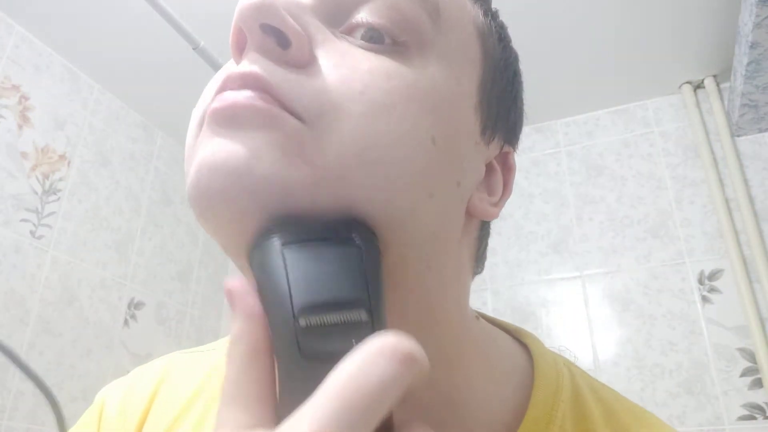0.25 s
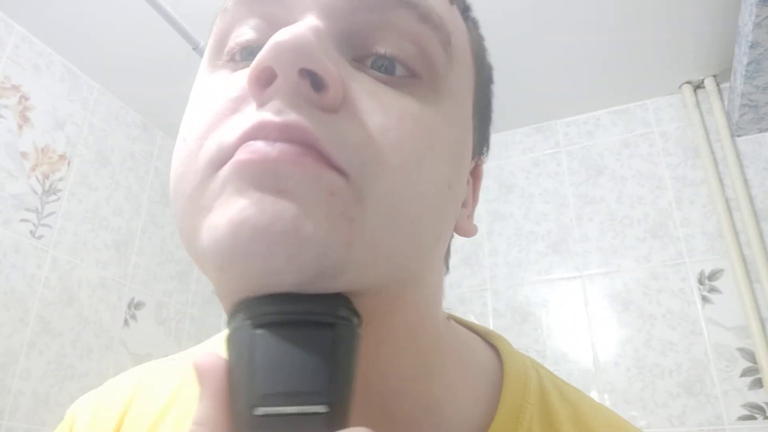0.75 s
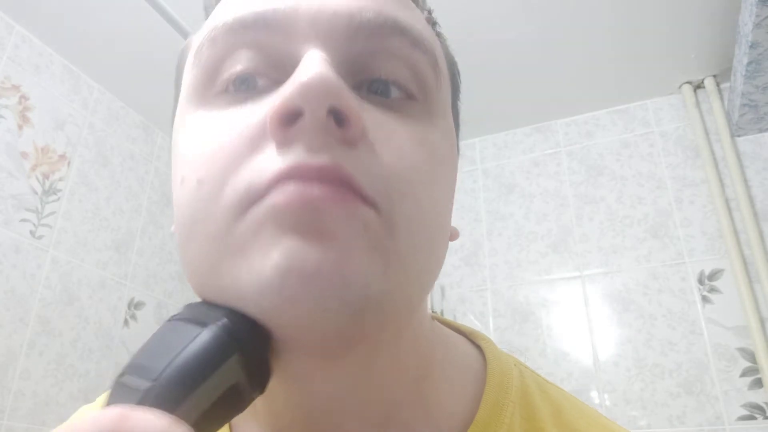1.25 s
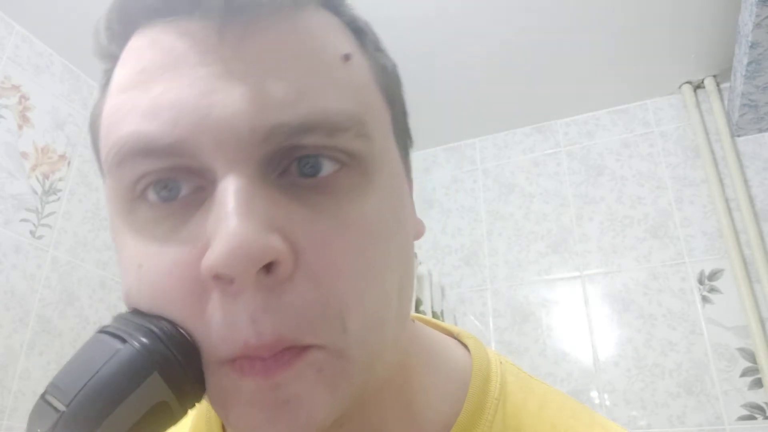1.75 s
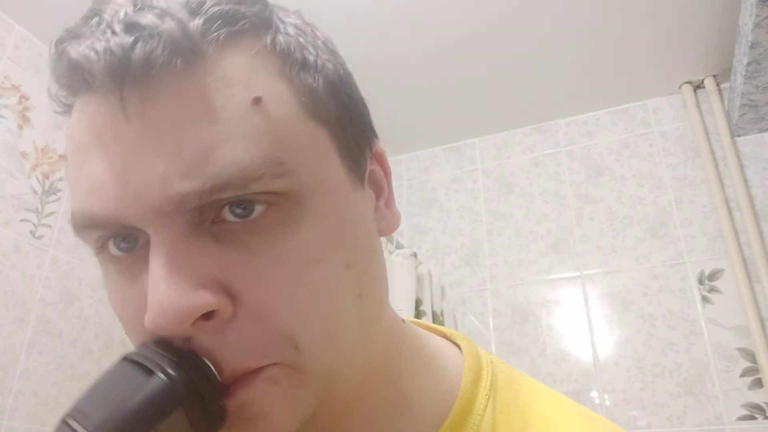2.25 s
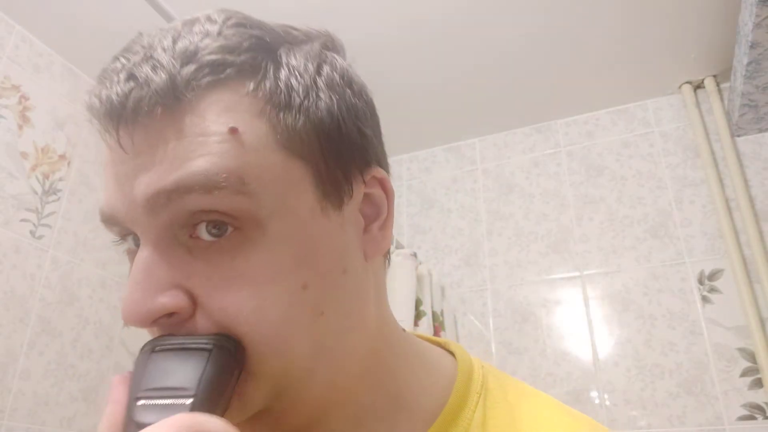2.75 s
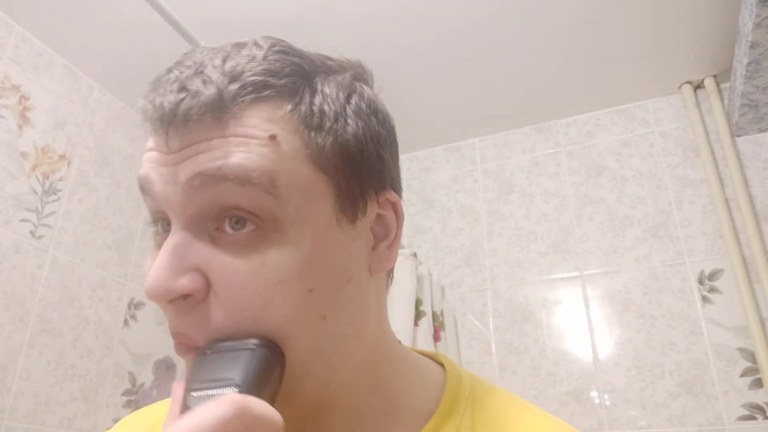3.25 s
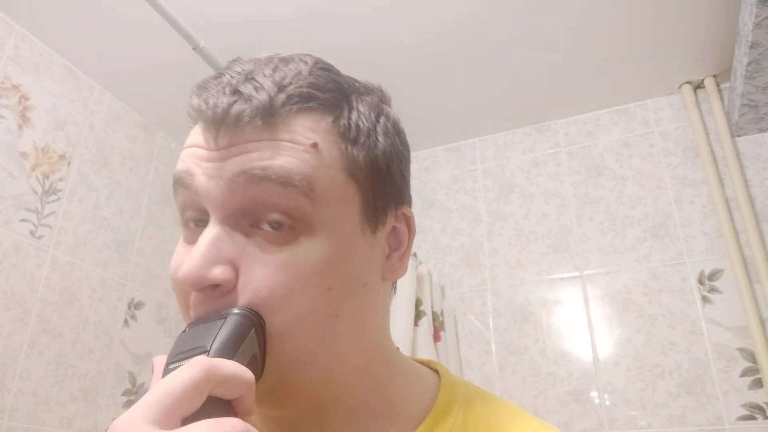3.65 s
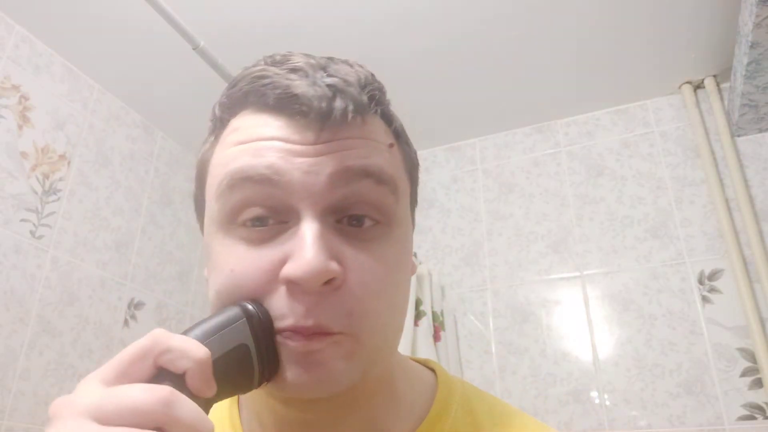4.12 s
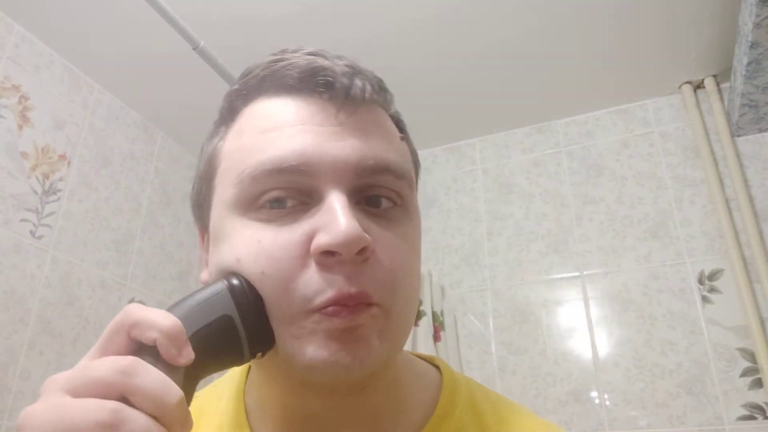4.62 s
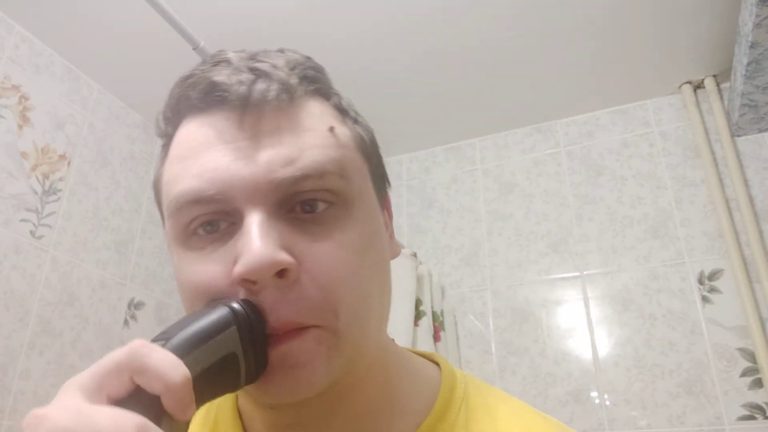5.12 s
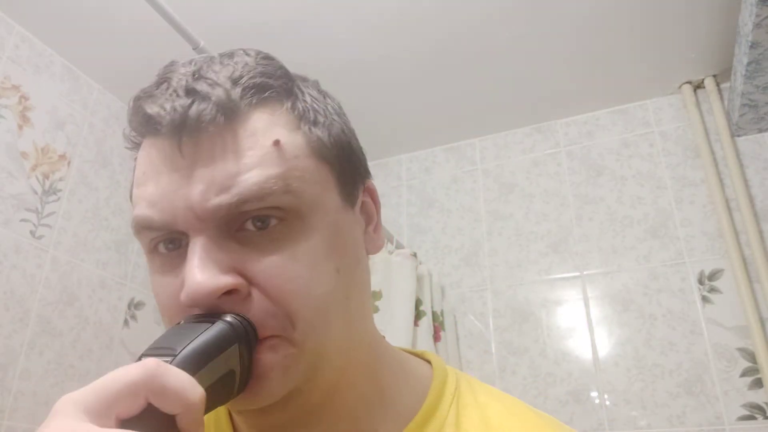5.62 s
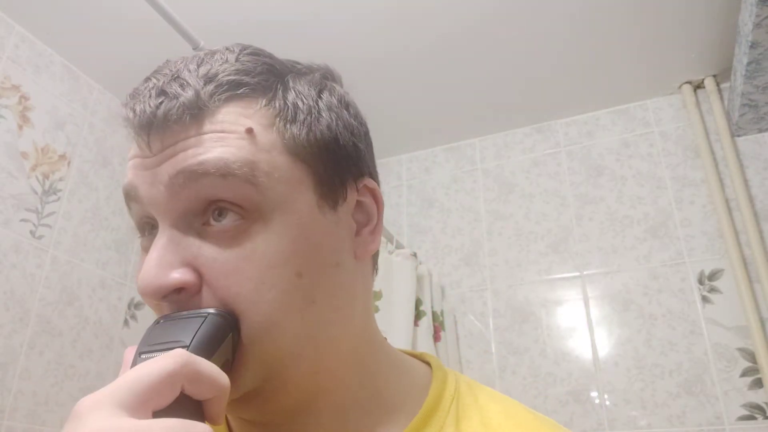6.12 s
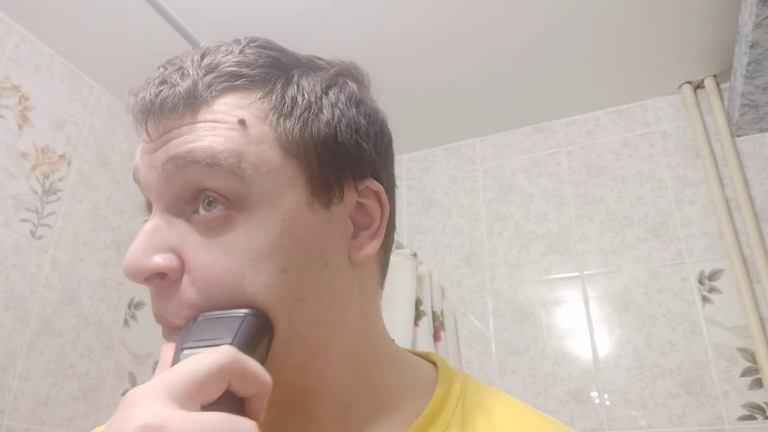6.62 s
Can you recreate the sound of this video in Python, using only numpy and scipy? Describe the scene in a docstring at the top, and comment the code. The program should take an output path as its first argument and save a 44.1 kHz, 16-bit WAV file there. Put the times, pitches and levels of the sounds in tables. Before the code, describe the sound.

The shaver is already running at 0 s and continues to the end, around 6.9 s, with no start or stop. Its gear whine, with a base near 550 Hz and stronger tones around 1.6 to 3.3 kHz, trembles and shifts slightly under load. Around it are a dry plastic rattle, fine stubble crackle and bright steel hiss, with the topmost sizzle stronger on the left. Small ticks and knocks come at 0.3 to 0.5, 1.3 and 1.8 s. Skin rustle is softly fuller from 1.5 to 2.5 s. From 2 to 3.2 s pressing makes the scrape rougher, with knocks near 2.3 and 2.8 s. A short hard rasp comes at 4 s, then lighter strokes; firmer scraping returns from 5 to 6 s, with ticks near 5.1 and 6 s, then eases. Short tiled reflections surround it over faint low air, drone and passing hums.

```python
"""A rotary electric shaver works over chin and lip at arm's length from a phone in a small tiled bathroom.
Motor and gear teeth whine as sums of wavering tones. The cutters are filtered noise: they hiss in their
steel caps, rattle the housing, snip stubble and scrape once a turn, harder when pressed.
Noise also makes the skin rustle and the knocks. Under it lie low air, a drone and faint low hums that
come and go. The left microphone gets more of the highest treble, the right one less."""
import sys
import numpy as np
from scipy import signal
from scipy.fft import rfft, irfft, next_fast_len
from scipy.io import wavfile
from scipy.ndimage import uniform_filter1d, map_coordinates

SR = 44100
rng = np.random.default_rng(int(sys.argv[2]) if len(sys.argv) > 2 else 0)


def waveform_to_disk(signal):
    """Save audio, clipped to [-1, 1], as 16-bit WAV at the path in sys.argv[1]."""
    frames = np.transpose(np.atleast_2d(signal))
    scaled = np.clip(frames, -1, 1) * 32767
    samples = np.round(scaled).astype(np.int16)
    wavfile.write(sys.argv[1], SR, samples)


N = 302922
TIME = np.arange(N) / SR
FFT_SIZE = next_fast_len(N)
FREQ = np.maximum(np.arange(FFT_SIZE // 2 + 1) * SR / FFT_SIZE, 1)

CUTTER_TEETH = 17  # teeth that pass in one turn of the cutters
# base colour of the steel hiss: (f/Hz, left level/dB per Hz, right level/dB per Hz)
HISS_COLOUR = [(2420, -112, -110), (4080, -91.5, -86.5), (4960, -89, -81.5), (5470, -86, -79.5),
               (6700, -87, -79.5), (7660, -83, -84.5), (9500, -82.5, -93.5), (11200, -81.5, -95.5),
               (13200, -83.5, -101), (15000, -88, -105), (15500, -87, -117)]
# how the cutters' level changes from one patch of stubble to the next; only the changes count:
# (t/s, housing rattle level/dB, steel hiss level/dB)
STUBBLE_PATCHES = [(0, -47, -39.5), (.5, -46.5, -39.5), (.72, -48.5, -41.5), (.95, -47, -39),
                   (1.2, -46.5, -44), (1.36, -45, -39), (1.7, -46.5, -43), (2.1, -47, -43.5),
                   (2.35, -47, -39.5), (2.8, -43.5, -40.5), (3.4, -48.5, -42), (3.8, -46, -43.5),
                   (4.06, -46.5, -40.5), (4.2, -47, -43), (4.65, -45, -43), (5.2, -47, -42),
                   (5.6, -46, -42), (5.98, -45.5, -39.5), (6.25, -46, -42), (6.87, -48, -44.5)]


def undb(db):
    """Turn decibels into gain."""
    return 10 ** (np.asarray(db) / 20)


def curves(table):
    """Draw straight lines between the rows of a table: one curve over time for each column."""
    s, *columns = np.transpose(table)
    return np.array([np.interp(TIME, s, c) for c in columns])


def colour(table):
    """Gain at every frequency for each dB column of a spectrum."""
    hz, *columns = np.transpose(table)
    return undb([np.interp(np.log(FREQ), np.log(hz), c) for c in columns])


def shape(x, gain):
    """Filter so that white noise of rms 1 gets the given density per Hz."""
    filtered = irfft(rfft(x, FFT_SIZE) * gain, FFT_SIZE)
    return filtered[..., :N] * np.sqrt(SR / 2)


def lift(x, hz, kind, db):
    """Raise or lower one band by a level curve."""
    sos = signal.butter(3, hz, kind, fs=SR, output="sos")
    return x + (undb(db) - 1) * signal.sosfiltfilt(sos, x)


def unit(x):
    """Scale to rms 1."""
    return x / np.sqrt(np.mean(x ** 2))


def walk(rate):
    """Smooth random curve that takes a new value, of spread 1, rate times a second."""
    knots = rng.standard_normal(int(N / SR * rate) + 4)
    steps = np.arange(0, len(knots) - 1, 1 / 8)
    fine = map_coordinates(knots, [steps], order=3, mode="nearest")
    return np.interp(TIME * rate * 8, np.arange(len(fine)), fine)


def blend_weights(count, rate):
    """Random weights that wander over time while their summed power stays 1."""
    weights = np.array([walk(rate) for _ in range(count)])
    return weights / np.sqrt(np.sum(weights ** 2, axis=0))


def held(start, end, attack_s, release_s):
    """Rise around start, hold at no more than 1, fall around end."""
    rise = .5 + (TIME - start) / attack_s
    fall = .5 + (end - TIME) / release_s
    return np.clip(np.minimum(rise, fall), 0, 1)


def resonate(x, hz, width):
    """Pass sound through one narrow resonance twice, then scale to rms 1."""
    b, a = signal.iirpeak(hz, hz / width, fs=SR)
    return unit(signal.lfilter(b, a, signal.lfilter(b, a, x)))


def tiles(x, t60, wet_db):
    """Direct sound plus a dense short ring of the tiled walls, different at each microphone."""
    t = TIME[:SR // 2]
    tail = rng.standard_normal((2, len(t))) * np.exp(-np.log(1000) * t / t60) * (t > .003)
    tail *= undb(wet_db) / np.sqrt(np.sum(tail ** 2, axis=1, keepdims=True))
    both = x * np.ones((2, 1))
    echoes = signal.fftconvolve(both, tail, axes=1)[:, :N]
    return (both + echoes) / np.sqrt(1 + undb(2 * wet_db))


def moving_tiles(x, t60, wet_db, count=4):
    """The wall echoes change as the shaver is moved: several rings blend into one another."""
    direct = x / np.sqrt(1 + undb(2 * wet_db))
    out = direct
    for weight in blend_weights(count, .98):
        out = out + weight * (tiles(x, t60, wet_db) - direct)
    return out


def low_background(drone_hz=29.6, apart=0.8, octave_db=-17):
    """Low air noise, a swelling deep drone and faint low hums with octaves, nearly alike on both sides."""
    # colour of each layer of air noise: (f/Hz, level/dB per Hz)
    air_colour = [(8, -88.5), (20, -84.5), (40, -94), (60, -95), (125, -103), (158, -97.5), (200, -106),
                  (500, -109), (2000, -118)]
    # swells of the drone, added to its resting level: (time of the peak t/s, added level/dB)
    swells = [(.25, -64), (1.7, -62), (2.15, -68), (3.75, -68), (4.65, -69), (5.05, -72), (5.85, -67),
              (6.6, -70)]
    # faint low hums come and go, one of them a harmonic of the motor shaft:
    # (start t/s, end t/s, f/Hz, level of the main tone/dB)
    hums = [(0, 0.18, 87.7, -71), (.05, .95, 295.3, -77.5), (0.698, 1.653, 108.3, -76.5),
            (0.897, 1.9, 89.7, -72.5), (3.39, 4.253, 79.6, -69.5), (4.297, 5.05, 107.6, -71.5),
            (4.349, 6.298, 77.05, -75), (5.243, 5.807, 106.5, -67)]
    rest_db, swell_s, hum_fade_s = -75.5, .17, .2

    air = rng.standard_normal(N) + apart * rng.standard_normal((2, N))
    out = shape(air, colour(air_colour))
    drone_gain = undb(rest_db)
    for s, db in swells:
        drone_gain = drone_gain + undb(db) * np.exp(-((TIME - s) / swell_s) ** 2)
    out = out + np.sqrt(2) * drone_gain * np.sin(2 * np.pi * drone_hz * TIME + .5 * walk(3.44))
    for start, end, hz, db in hums:
        angle = 2 * np.pi * hz * TIME + .11 * walk(5.2)
        tone = np.sin(angle) + undb(octave_db) * np.sin(2 * angle)
        out = out + np.sqrt(2) * undb(db) * held(start, end, hum_fade_s, hum_fade_s) * tone
    return out


def skin(apart=0.15):
    """The head slides over skin: low noise rustles softly."""
    # base colour of the rustle: (f/Hz, level/dB per Hz)
    skin_colour = [(60, -115), (160, -100.5), (240, -101), (320, -99), (500, -103), (1200, -114)]
    # how the rustle's level changes; only the changes count: (t/s, level/dB)
    rustle_level = [(0, -71.5), (.8, -72.5), (1.5, -65.5), (2.15, -65.5), (2.55, -67.5), (3, -70),
                    (3.5, -71), (5.5, -76), (6.87, -83)]
    noise = rng.standard_normal(N) + apart * rng.standard_normal((2, N))
    return shape(noise, colour(skin_colour)) * unit(undb(curves(rustle_level)[0]))


def knocks(tick_db=38, body_db=47, tick_s=0.005, body_s=0.018, lead_s=0.003):
    """The floating head skids and clicks in its mount: a steel tick and a short chatter of the housing."""
    # stubble catches and the head knocks on its mount, before tick_db and body_db are added:
    # (t/s, tick level/dB, body level relative to it/dB)
    catches = [(.307, -41, -5), (0.4398, -33.5, -13), (.486, -31, -26), (1.2864, -31, -22),
               (1.8383, -34, -12), (2.296, -38, -2), (2.832, -32, -16), (5.145, -32, -22),
               (5.995, -30.5, -5)]
    # colour of the housing's thud: (f/Hz, level/dB per Hz)
    thud_colour = [(150, -112), (400, -101), (700, -93.5), (1200, -93), (2300, -82), (3000, -85),
                   (4500, -97), (8000, -122)]
    skid_db, skid_rate = 3, 450  # spread of the chatter in dB, new values per second

    tick, body = np.zeros((2, N))
    for s, db, low_db in catches:
        age = TIME - s
        tick += (age > 0) * undb(db + tick_db) * np.exp(-np.abs(age) / tick_s)
        # the body rises over lead_s and dies away over body_s
        body += undb(db + low_db + body_db) * np.exp(-np.maximum(age / body_s, -age / lead_s))
    noise = rng.standard_normal((2, N)) * unit(undb(skid_db * walk(skid_rate)))
    dry_knocks = shape(tick * noise, colour(HISS_COLOUR)) + shape(body * noise, colour(thud_colour))
    return tiles(dry_knocks, t60=0.13, wet_db=-25)


def random_sizes(spread_db=3):
    """Gains for small hits: many faint, a few loud."""
    return undb(spread_db * np.minimum(rng.exponential(size=N), 3))


def snips(rate=450, ring_s=0.00079):
    """Single hairs are cut with tiny cracks: random hits start short fading bursts of noise."""
    hits = (rng.random(N) < rate / SR) * random_sizes()
    fading = signal.lfilter([1], [1, -np.exp(-1 / (ring_s * SR))], hits)
    return unit(fading * rng.standard_normal((2, N)))


def housing_ring(teeth, rate=700):
    """Blade taps ring the plastic housing; as the grip shifts, one resonance after another comes forward."""
    # resonances of the housing: (f/Hz, width/Hz, left level/dB, right level/dB)
    housing_modes = [(1475, 130, -72, -70.5), (1803, 120, -61, -62), (2057, 170, -71, -68),
                     (2385, 180, -58, -64), (2560, 130, -64, -65.5), (2800, 140, -60, -66.5),
                     (3080, 230, -64, -64), (3764, 300, -65, -66)]
    grip_db, grip_rate = 3.5, 7  # spread of their strength in dB, new values per second

    # taps are likeliest once per passing tooth
    chance = rate / SR * (1 + np.cos(2 * np.pi * teeth))
    taps = (rng.random(N) < chance) * random_sizes() * rng.standard_normal((2, N))
    out = 0
    for hz, width, left_db, right_db in housing_modes:
        strength = unit(undb(grip_db * walk(grip_rate)))
        out = out + undb([[left_db], [right_db]]) * resonate(taps, hz, width) * strength
    return out * unit(undb(curves(STUBBLE_PATCHES)[0]))


def pressure():
    """How hard the head lies on the skin, about 0-1."""
    # the head is pushed against the skin: (start t/s, end t/s, pressure 0-1)
    pushes = [(0.092, 0.363, 0.18), (1.05, 1.347, 0.26), (1.493, 1.645, 0.27), (1.7, 2.047, 0.5),
              (2.072, 2.367, 0.83), (2.473, 2.7, 0.56), (2.69, 2.876, 0.78), (2.908, 3.246, 0.46),
              (3.424, 3.883, 0.31), (3.938, 4.03, 0.93), (4.33, 4.632, 0.32), (5.037, 5.276, 0.75),
              (5.3, 5.6, 0.57), (5.6, 5.803, 0.73), (5.83, 6.015, 0.58), (6.306, 6.53, 0.44),
              (6.616, 6.783, 0.33)]
    return sum(force * held(start, end, .097, .095) for start, end, force in pushes)


def clatter(teeth, size=1400):
    """The gear's small flaws come round again with every turn, and change slowly as the load shifts."""
    turns = teeth / (CUTTER_TEETH + 1)
    flaws = rng.standard_normal((6, size))
    places = np.arange(size) / size
    weights = blend_weights(len(flaws), 7)
    return unit(sum(w * np.interp(turns % 1, places, f) for w, f in zip(weights, flaws)))


def scrape(teeth, press, depth=2.6):
    """Once a turn a pressed cutter catches on its cap and slips free over about six milliseconds."""
    turns = teeth / CUTTER_TEETH - .85
    turn = np.round(turns)
    # every turn catches with its own random strength
    strength = undb(rng.standard_normal(int(turn[-1]) + 2))[turn.astype(int) + 1]
    offset = turns - turn
    contact = np.exp(-(offset / .11) ** 4) * (1 - 2.5 * offset)  # hardest early in the catch
    gate = 1 + depth * press * strength * contact
    return gate / np.sqrt(uniform_filter1d(gate ** 2, SR // 16))  # keep the average level even


def squeals(force, left_db=-11):
    """Each light glide excites one narrow resonance of a cap, at its own pitch."""
    # the caps squeal in light contact: (start t/s, end t/s, right level/dB, f/Hz, width/Hz)
    glides = [(0.045, .35, -48, 5500, 450), (0.067, 0.73, -48.5, 6030, 550), (0.393, .72, -50, 5430, 447),
              (0.735, 1.243, -48.5, 5820, 453), (1.22, 1.617, -51, 3010, 139.4),
              (1.418, 1.497, -39.5, 5820, 350), (2.433, 2.597, -42.5, 5710, 300),
              (2.611, 2.768, -46, 5790, 300.4), (2.814, 2.86, -44, 6600, 400), (3.61, 3.86, -50, 5690, 450),
              (3.874, 4.064, -47.5, 5850, 500), (4.953, 5.154, -46.5, 5680, 400),
              (5.62, 5.964, -48.5, 5760, 500)]
    out = np.zeros((2, N))
    for start, end, db, hz, width in glides:
        gate = held(start, end, .076, .092)
        on = gate > 0
        friction = (force * rng.standard_normal((2, N)))[:, on]
        out[:, on] += undb(db) * gate[on] * resonate(friction, hz, width)
    return out * undb([[left_db], [0]])  # left_db is relative to the right


def cap_mode(mode, force, bend):
    """Friction noise held in one steep-sided resonance whose pitch follows the load."""
    hz, width, left_db, right_db = mode[:4]
    band = undb([[left_db], [right_db]]) / (1 + 1j * FREQ / width) ** 2
    angle = 2 * np.pi * np.cumsum(hz * bend) / SR
    out = 0
    for wave in (np.cos, np.sin):  # two noises carried a quarter cycle apart
        out = out + shape(force * rng.standard_normal((2, N)), band) * wave(angle)
    return np.sqrt(2) * out


def cap_ring(mesh, ring_gain, drag, slip_db=1.03):
    """Friction rings the steel caps; each mode grips and slips a little on its own."""
    # resonances of the steel caps, the 11.6 kHz one strongest:
    # (f/Hz, width/Hz, left level/dB per Hz, right level/dB per Hz, share of the scrape 0-1)
    cap_modes = [(11595, 360, -71.5, -89, 0.95), (14450, 350, -75.5, -94, 0.47),
                 (8590, 110, -78, -87.5, 0.46), (5790, 420, -91, -83, 0), (2895, 145, -81, -85.5, 0)]
    # load bends the pitch of all modes alike: (t/s, strongest mode f/Hz)
    cap_pitch = [(0, 11470), (.1, 11870), (.28, 11870), (.45, 11670), (1.5, 11770), (1.8, 11580),
                 (3.2, 11640), (3.7, 11430), (4.05, 11690), (4.6, 11700), (5.2, 11570), (5.9, 11490),
                 (6.25, 11430), (6.87, 11680)]
    # extra level of the highest mode: (t/s, level/dB)
    upper_ring = [(0, -6), (1.4, 1), (1.6, 2), (2.3, 2), (2.5, 3), (3.22, 2), (3.35, -3), (4, 1),
                  (4.45, -1), (5.1, -2), (6.1, 2.5), (6.87, -6)]
    bend = curves(cap_pitch)[0] / cap_modes[0][0]
    out = 0
    for k, mode in enumerate(cap_modes):
        grip_db = slip_db * walk(28)
        if k == 1:  # the highest mode
            grip_db = grip_db + curves(upper_ring)[0]
        force = mesh * (ring_gain * drag) ** mode[4] * undb(grip_db)
        out = out + cap_mode(mode, force, bend)
    return out


def cutters(teeth, shared=0.54, snip_db=-12, hiss_share=0.25):
    """Housing rattle, steel hiss pulsing with the teeth, and the ring of the caps under the scraping."""
    # base colour of the housing rattle: (f/Hz, left level/dB per Hz, right level/dB per Hz)
    rattle_colour = [(133, -104, -104), (415, -100, -102), (740, -93, -103), (1070, -88.5, -93.5),
                     (1190, -91.5, -99.5), (1422, -90, -86), (1570, -84.5, -87), (2170, -85, -83.5),
                     (2680, -81, -84), (3300, -89, -88), (3970, -86, -86), (4700, -100.5, -97.5),
                     (8100, -125, -125)]
    # extra level of two bands: (t/s, rattle's low end level/dB, hiss's bright band level/dB)
    band_levels = [(0, -0.5, -1), (.9, 0, 2), (1.4, 1, 4.5), (2.2, 1.5, 3), (2.8, -4, -1.5), (3.5, 0, 0),
                   (4, -0.5, 1), (4.55, -5.5, 2.5), (5, -0.5, 0.5), (6, -2, 0), (6.87, 1, 3.5)]
    # growth with pressure, in dB per unit of pressure, before the average is evened out
    rattle_pressed_db, hiss_pressed_db, ring_pressed_db = 1.8, 2.5, 14
    resting_drag = .32  # least pressure that counts for the scrape
    tooth_depth, clatter_weight = .33, .68  # pulse by each tooth 0-1, gear clatter against noise

    press = pressure()
    rattle_db, hiss_db = curves(STUBBLE_PATCHES)
    rattle_gain = unit(undb(rattle_db + rattle_pressed_db * press))
    hiss_gain = unit(undb(hiss_db + hiss_pressed_db * press))
    ring_gain = unit(undb(ring_pressed_db * press))
    drag = scrape(teeth, np.maximum(press, resting_drag))
    mesh = unit(1 + tooth_depth * np.cos(2 * np.pi * teeth))
    low_db, bright_db = curves(band_levels)

    # one part for each microphone, and a part shared by both
    noise = rng.standard_normal((2, N)) + shared * rng.standard_normal(N)
    repeating = np.array([clatter(teeth), clatter(teeth)]) + shared * clatter(teeth)
    housing = noise + clatter_weight * repeating
    rattle = unit(moving_tiles(housing, t60=0.32, wet_db=-5.0)) * rattle_gain
    rattle = lift(shape(rattle, colour(rattle_colour)), 1240, "lowpass", low_db)

    hiss = unit(rng.standard_normal((2, N)) * mesh + undb(snip_db) * snips())
    # stubble meets the blades in uneven patches
    hiss = hiss * hiss_gain * drag ** hiss_share * undb(.5 * walk(36))
    steel = lift(shape(hiss, colour(HISS_COLOUR)), (7260, 10200), "bandpass", bright_db)
    steel = steel + squeals(mesh * np.sqrt(drag)) + cap_ring(mesh, ring_gain, drag)
    return rattle + moving_tiles(steel, t60=0.14, wet_db=-9.0)


def partial(turns, db, fade_db, stray, flutter=0, flicker=.19):
    """One tone at both microphones; wall echoes make it flicker, uneven load makes it flutter."""
    start, fade = rng.uniform(0, 2 * np.pi), walk(4.05)
    tone = np.exp(1j * (2 * np.pi * turns + start))
    tone = tone * (1 + flutter * (walk(60) + 1j * walk(60)))
    heard = []
    for side_db in db:
        echo = 1 + flicker * (walk(22) + 1j * walk(22))
        path = np.exp(1j * stray * walk(1.597))  # the phase wanders on the way to this microphone
        heard.append(undb(side_db + fade_db * fade) * np.imag(tone * echo * path))
    return np.array(heard) * np.sqrt(2 / (1 + 2 * flicker ** 2))


def motor_shaft(teeth, shaft_db=-2.0):
    """The motor shaft turns in step with the gear and sounds some of its harmonics."""
    # which multiples of the shaft's turning rate are heard
    shaft_orders = [1, 2, 5, 6, 8, 9, 12, 13, 14, 15, 18]
    # base level of each of them, before shaft_db is added: (left level/dB, right level/dB)
    shaft_levels = [(-77, -77), (-78.5, -85.5), (-78.5, -82), (-78, -73), (-80, -81), (-87, -87),
                    (-86, -86), (-78, -82), (-81, -83), (-84, -77), (-64.5, -64.5)]
    # how all of them change together; only the changes count: (t/s, level/dB)
    shaft_course = [(0, -4.5), (2.3, -4), (3.6, -3), (4.3, -4), (4.7, -5), (5.3, -7), (6.2, -5), (6.87, -2)]
    shaft_turns = 8 / 45 * teeth
    out = 0
    for order, db in zip(shaft_orders, shaft_levels):
        out = out + partial(order * shaft_turns, np.add(db, shaft_db), fade_db=1.5, stray=.37)
    return out * unit(undb(curves(shaft_course)[0]))


def whine(teeth, whine_db=.8):
    """Gear mesh and motor tones; the cutters' drag swings the mesh tones once a turn."""
    # the loud partials, as multiples of the tooth rate
    whine_orders = [1, 8 / 5, 16 / 9, 88 / 45, 25 / 9, 3, 55 / 18, 32 / 9, 4, 5, 91 / 17, 6]
    # level of each partial as the shaver turns in the room, before whine_db is added,
    # one curve each: (t/s, left level/dB, right level/dB)
    whine_levels = [
        [(0.0, -63.5, -69), (1.0, -67, -73), (1.44, -64.5, -73.0), (1.88, -75, -79), (2.04, -63, -68),
         (2.6, -65.0, -71), (2.96, -61, -66.5), (3.4, -67, -71), (4.08, -69.5, -74), (4.64, -65, -69.0),
         (4.84, -74.5, -78), (5.48, -65.5, -68), (5.84, -70, -72), (6.12, -59.5, -64.5), (6.4, -66.5, -71),
         (6.84, -60.5, -64)],
        [(0.0, -73.0, -79), (1.2, -71, -79), (1.52, -65, -82), (1.92, -79, -79.0), (2.6, -64, -80.5),
         (2.72, -71, -79.5), (2.88, -65, -76.5), (2.96, -70, -80.0), (3.52, -62, -76), (4.48, -97, -94),
         (5.4, -73.0, -83.0), (6.4, -67, -80.0), (6.84, -68.5, -81.5)],
        [(0.0, -65, -85), (0.28, -67, -82), (0.44, -69, -79), (0.64, -61, -84), (0.88, -69, -78),
         (1.16, -58, -83), (1.28, -74, -66.0), (1.44, -65, -83), (1.6, -64, -71), (1.72, -64, -76),
         (3.36, -73, -86.0), (3.48, -63, -92), (4.8, -70, -90), (6.6, -69, -80), (6.84, -66.0, -85.5)],
        [(0.0, -77.0, -80.5), (0.12, -69, -74), (0.24, -69, -75), (0.56, -69, -68), (0.68, -74, -69),
         (0.84, -62.0, -77), (1.24, -67, -81), (2.32, -60.5, -83), (2.44, -59.5, -69.5), (3.08, -71, -78.5),
         (3.4, -63, -75), (4.32, -85.0, -85), (5.16, -61.0, -81), (6.24, -76.0, -79.5), (6.84, -60.0, -87.5)],
        [(0.0, -69.5, -76), (0.8, -67, -78), (1.2, -73.5, -61), (1.8, -76, -86), (4.36, -68.5, -60.5),
         (6.48, -71, -74), (6.76, -63.5, -56.5), (6.84, -69.5, -62.0)],
        [(0.0, -61, -55), (0.2, -76, -51.0), (0.32, -72, -66), (0.68, -63, -61), (0.8, -77, -62),
         (0.96, -73, -49.5), (1.04, -69, -48), (1.24, -78, -54), (1.36, -51, -55), (1.44, -63, -52.5),
         (1.96, -69, -57), (2.16, -51.5, -46), (2.28, -52.0, -65), (2.52, -73, -70), (3.32, -63, -65),
         (3.44, -68.0, -64.0), (3.56, -74, -59), (3.76, -75, -57), (4.24, -70, -51.5), (4.72, -60.0, -57),
         (4.8, -72, -62), (5.24, -79, -55), (6.12, -67, -65.0), (6.84, -69.0, -64)],
        [(0.0, -75.0, -66), (2.12, -57, -59), (2.52, -70, -68), (3.0, -71.0, -61), (3.12, -64, -70),
         (4.64, -72, -60), (4.72, -80, -57), (6.44, -85, -77), (6.84, -70.5, -72.5)],
        [(0.0, -75.0, -63.5), (0.08, -74, -54), (0.44, -76, -64), (0.56, -77, -51), (0.88, -59, -76),
         (1.12, -70, -59), (1.28, -59.0, -51.0), (1.56, -68, -65), (1.76, -70, -56), (1.84, -67, -60),
         (2.08, -72, -51.5), (2.24, -68, -61), (3.28, -77, -62), (3.6, -59.0, -60), (4.0, -67.0, -61),
         (4.24, -70.5, -54.5), (4.96, -66, -61), (5.76, -66, -71), (6.16, -58, -54), (6.36, -58, -61),
         (6.72, -58, -54), (6.84, -67, -58.5)],
        [(0.0, -68.5, -62.0), (0.12, -56.0, -71), (0.24, -66, -67), (0.44, -58.5, -60), (0.56, -71.5, -71.0),
         (0.88, -60, -75), (1.36, -63.5, -62), (1.48, -55, -69.5), (1.8, -65, -58), (2.24, -58, -55),
         (2.64, -61, -57), (3.24, -63.0, -70), (3.48, -62.0, -63), (3.56, -60, -72), (3.8, -77, -69),
         (4.04, -57.0, -56), (4.16, -67.0, -67.0), (5.0, -60, -64.5), (5.16, -59.5, -57), (5.64, -56, -57.5),
         (6.36, -71, -74.5), (6.52, -65, -66), (6.68, -68.5, -67), (6.84, -60, -63)],
        [(0.0, -55.0, -71.0), (0.16, -59, -75), (0.84, -49.5, -82), (1.0, -58, -73), (1.12, -55, -72.5),
         (1.24, -53.5, -69), (1.84, -63, -59), (2.76, -58.0, -70), (2.84, -49.5, -66), (3.08, -64, -62.5),
         (3.16, -53.5, -68.5), (3.56, -73, -78.5), (3.96, -70, -64.0), (4.2, -64, -73), (4.6, -62, -58),
         (5.04, -62, -66), (5.64, -63, -64), (6.2, -54.5, -70), (6.28, -62, -66), (6.48, -54.5, -53),
         (6.68, -60, -81), (6.84, -61.5, -64)],
        [(0.0, -57.5, -75), (0.76, -75, -80), (0.92, -59.5, -81), (1.68, -62.0, -52.5), (2.16, -78, -76.0),
         (2.44, -59, -64.5), (3.24, -57, -63), (5.36, -74, -68), (5.56, -57, -57), (5.68, -67, -70),
         (6.36, -60, -72.0), (6.84, -77, -76.5)],
        [(0.0, -59, -76.0), (0.16, -72, -71), (0.32, -75.5, -79.5), (0.68, -59, -70), (1.24, -72, -76),
         (5.76, -77, -71), (6.48, -75, -61), (6.84, -78.0, -82.0)],
    ]
    # for the highest partial: swing once a turn, phase wander in radians, quick flutter under load
    wobble, stray, flutter = .27, .6, .3

    out = 0
    for order, level in zip(whine_orders, whine_levels):
        depth = order / max(whine_orders)  # higher partials waver more
        swing = 1 + depth * wobble * np.sin(2 * np.pi * teeth / CUTTER_TEETH + walk(2.98))
        tone = partial(order * teeth, curves(level) + whine_db, fade_db=.5,
                       stray=stray * np.sqrt(depth), flutter=flutter * np.sqrt(depth))
        out = out + swing * tone
    return out + motor_shaft(teeth)


def scene():
    """One gear train drives tones and cutters; its speed sags under load and trembles slightly."""
    # gear speed: (t/s, tooth rate f/Hz)
    gear_speed = [(0.0, 542.5), (0.12, 551.0), (0.44, 551.0), (0.52, 548.0), (0.72, 549.0), (0.84, 555.5),
                  (1.04, 549.5), (1.36, 561.5), (1.52, 559.0), (1.72, 545.0), (1.88, 548.5), (2.04, 542.5),
                  (2.2, 547.5), (2.4, 549.0), (2.52, 545.0), (2.72, 547.5), (2.92, 545.5), (3.0, 540.0),
                  (3.12, 545.0), (3.32, 546.0), (3.64, 542.5), (4.04, 554.0), (4.12, 549.5), (4.44, 549.0),
                  (4.64, 555.5), (4.8, 538.0), (5.12, 547.5), (5.48, 545.5), (5.8, 542.0), (5.88, 545.5),
                  (6.2, 541.5), (6.86, 547.0)]
    # count of teeth passed so far, with a tremble in teeth
    teeth = np.cumsum(curves(gear_speed)[0]) / SR + .009 * walk(40)
    background = low_background()
    return background + skin() + knocks() + housing_ring(teeth) + cutters(teeth) + whine(teeth)


def record(dry):
    """The phone cuts the top: a steep low-pass filter ends the sound near 15750 Hz."""
    return signal.sosfilt(signal.ellip(12, .1, 80, 15750, fs=SR, output="sos"), dry)


dry = scene()
out = record(dry)
waveform_to_disk(out)
```